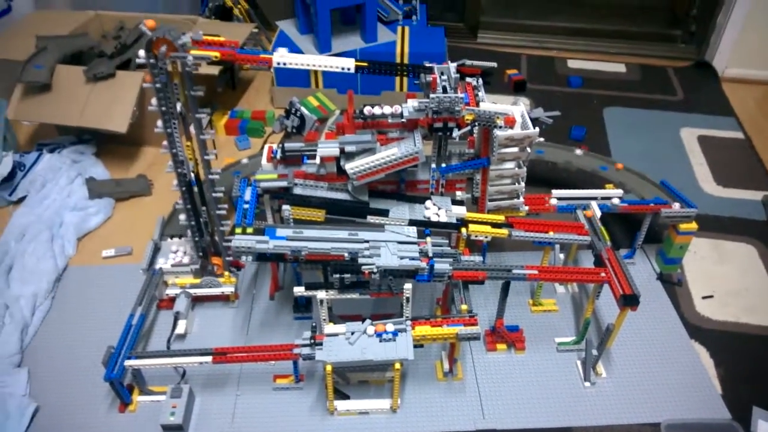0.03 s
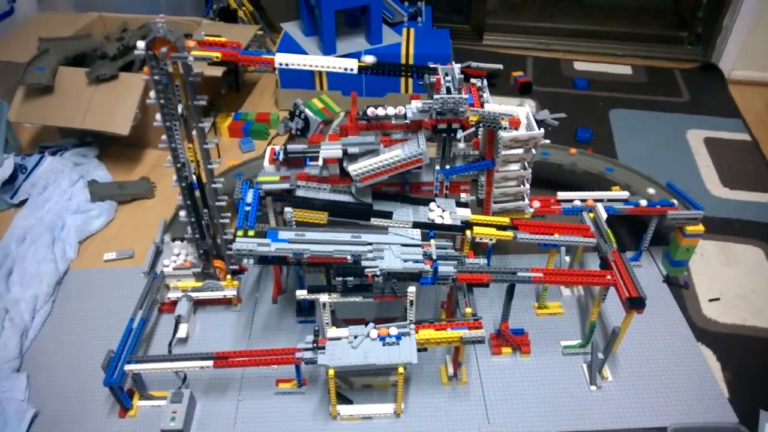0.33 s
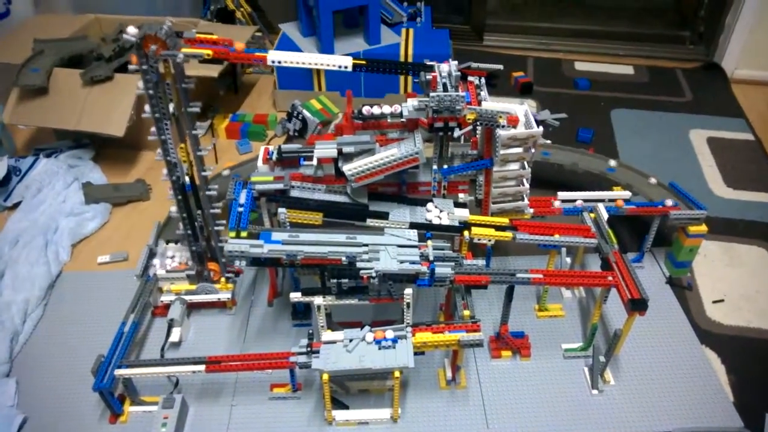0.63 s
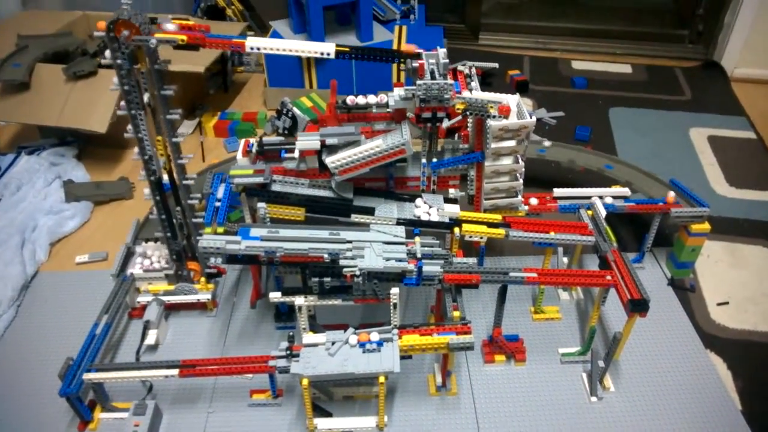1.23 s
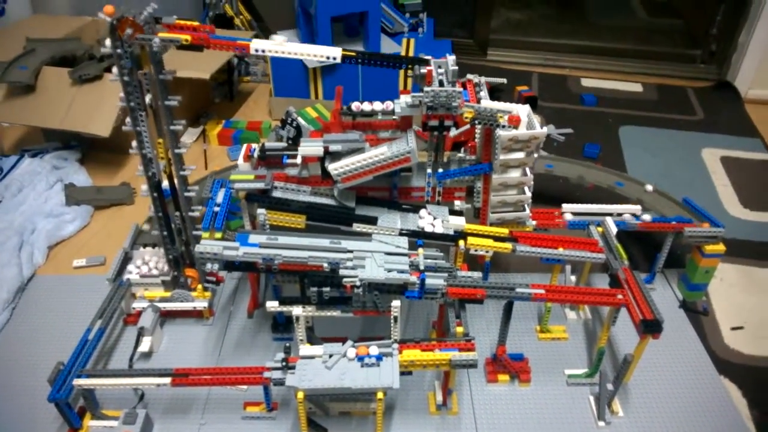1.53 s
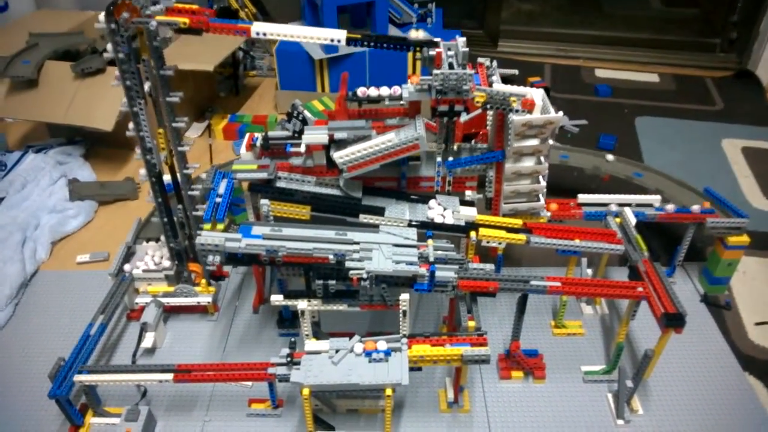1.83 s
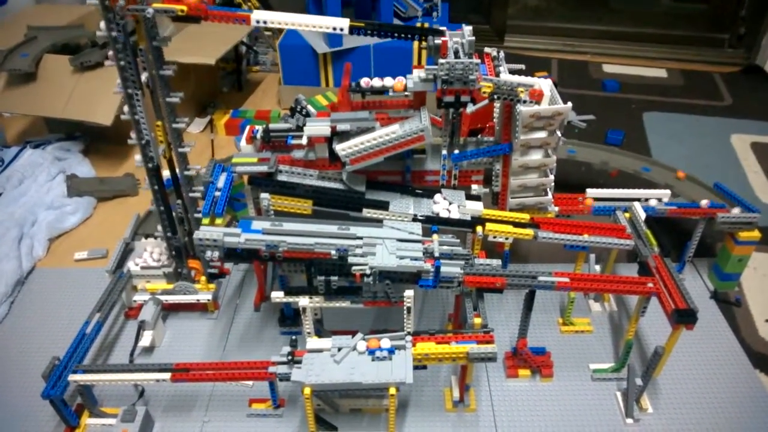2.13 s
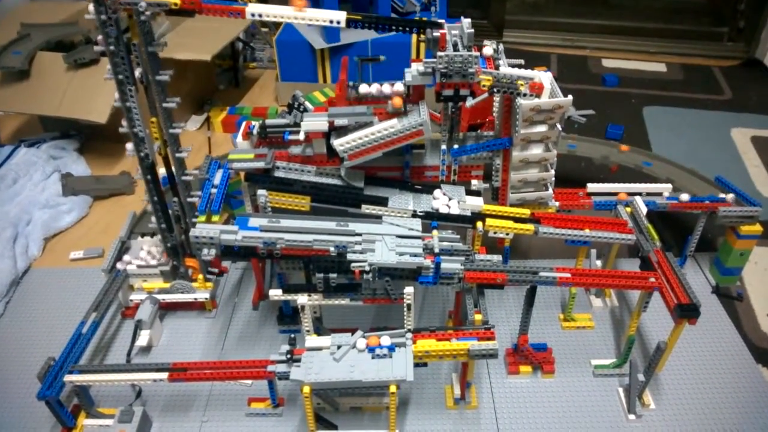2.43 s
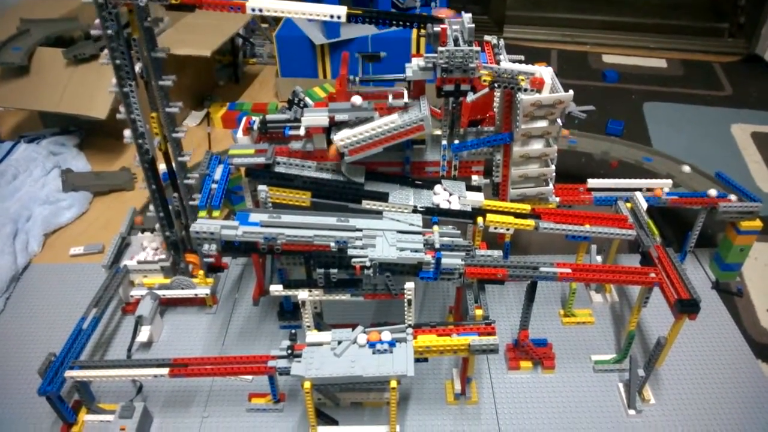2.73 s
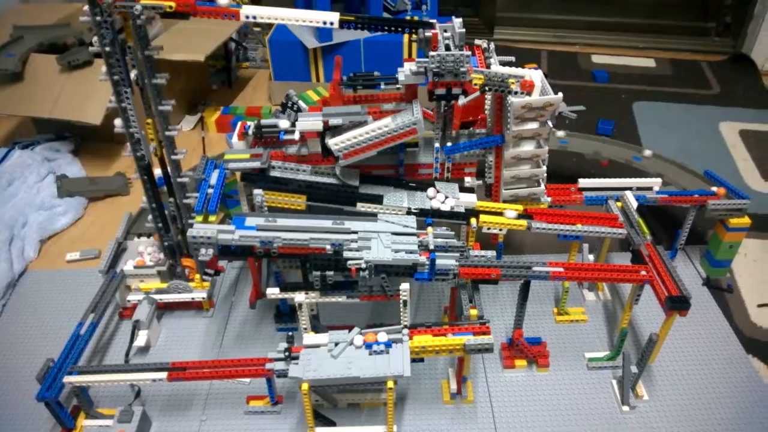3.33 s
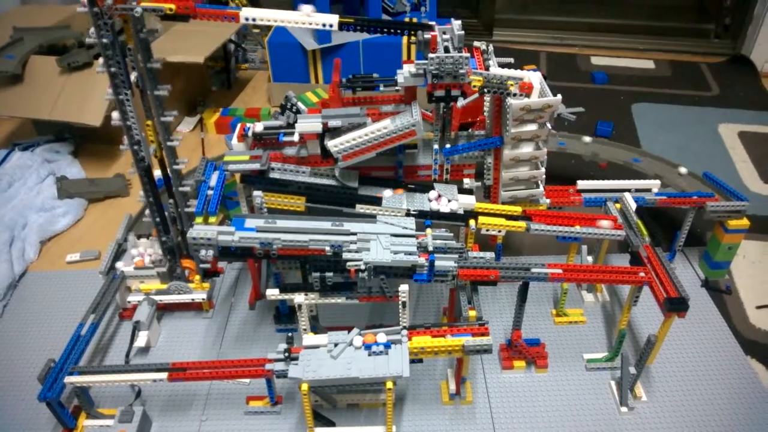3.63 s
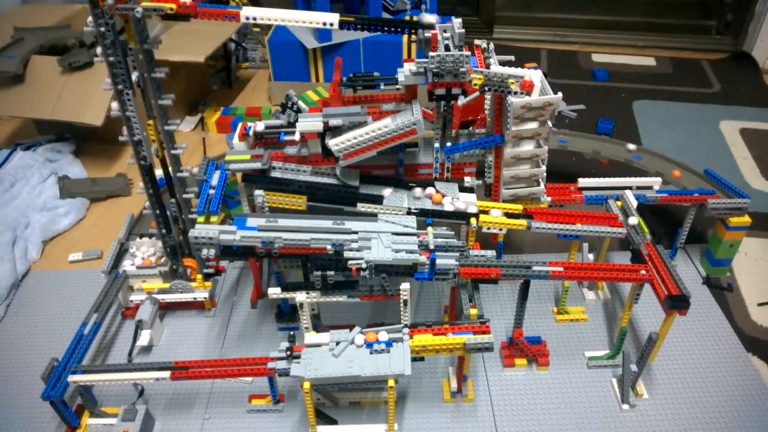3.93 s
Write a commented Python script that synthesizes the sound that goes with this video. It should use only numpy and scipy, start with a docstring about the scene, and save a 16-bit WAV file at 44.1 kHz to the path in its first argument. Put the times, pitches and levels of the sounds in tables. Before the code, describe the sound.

Continuous plastic clatter and clicking balls from a toy brick machine running indoors.

```python
"""A ball-moving machine of plastic toy bricks runs about a metre away in a small room.
Lifts and levers strike the frame and excite its damped modes; beams ping, pins clink and hard balls
click together. Beneath them, random impacts of gears and rolling balls merge into a rattle, with a
fine gear hiss and a faint low rumble. Once something bumps softly right at the microphone."""
import sys
import numpy as np
from scipy import signal
from scipy.fft import rfft, irfft
from scipy.io import wavfile

SR = 44100
rng = np.random.default_rng(int(sys.argv[2]) if len(sys.argv) > 2 else 0)


def dump_mix(stems):
    """Bounce the given channels to the path in sys.argv[1] as a 16-bit WAV at rate SR."""
    frames = np.atleast_2d(stems).T  # one column per channel
    limited = np.clip(frames, -1, 1)  # hard clip at full scale
    pcm = np.round(limited * 32767).astype(np.int16)
    wavfile.write(sys.argv[1], SR, pcm)


N = 176400
T = np.arange(int(.3 * SR)) / SR  # time axis of one impact, t/s

# All levels in the tables are relative; each source applies its own gain.
# Envelope of the rattle: t/s, middle level/dB, treble level/dB
RATTLE_ENVELOPE = [(0.0, -28, -26.5), (0.14, -42.5, -36.5), (0.41, -33, -30.5), (0.54, -39.5, -39.5),
                   (0.88, -35, -36), (1.09, -40.5, -72), (1.32, -43, -36.5), (1.47, -42, -41.5),
                   (1.6, -33, -31.5), (1.67, -36.5, -39), (1.99, -38.5, -39), (2.66, -36.5, -38),
                   (2.82, -39, -35.5), (2.96, -31.5, -35.5), (3.24, -34, -34.5), (3.44, -32.5, -30.5),
                   (3.81, -37, -34), (4.0, -32.5, -35.5)]
# Spectra of the rattle and of the low rumble: f/Hz, level/dB
RATTLE_SPECTRUM = [(120, -70), (200, -18.5), (322, -7), (519, -10), (569, -3), (647, -11.5), (1060, 4.5),
                   (1370, -0.5), (1590, 7), (2210, -2), (2750, -5.5), (4520, -15), (5230, -14.5),
                   (5730, -23.5), (10100, -16.5), (13600, -28), (16000, -43)]
RUMBLE_SPECTRUM = [(20, 1), (50, 1.5), (80, 1.5), (108, 6), (140, -.5), (220, -.5), (400, 0), (1000, -41)]
# Blows on the frame: t/s, level/dB of (snap, hollow body, low ring, middle ring, bright edge), t60/s
FRAME_KNOCKS = [(0.0014, -19.5, -64, -19, -22, -32, 0.17), (0.0265, -12, -52, -18, -17, -26.5, 0.25),
                (0.0424, -21, -52, -15.5, -16, -41, 0.14), (0.0532, -17, -61, -16.5, -21, -27.5, 0.15),
                (0.0659, -35, -51, -20, -25, -51, 0.34), (0.0897, -22, -52, -25, -13, -29.5, 0.17),
                (0.1209, -17.5, -56, -21, -24, -27.5, 0.2), (0.1329, -19.5, -49, -18, -40, -32, 0.18),
                (0.1653, -23, -50, -24.5, -22, -41, 0.19), (0.2022, -25, -53, -24, -33, -39, 0.11),
                (0.2461, -23, -42, -23, -27, -65, 0.44), (0.2957, -18, -49, -28, -20.5, -45, 0.27),
                (0.3279, -21, -41, -31, -21.5, -28.5, 0.085), (0.3571, -19, -45, -22, -18.5, -30, 0.23),
                (0.3722, -19, -40, -23, -22, -32, 0.12), (0.391, -16.5, -56, -22, -15, -28, 0.062),
                (0.5005, -18, -48, -21.5, -16, -31, 0.38), (0.5098, -15.5, -47, -31, -26, -44, 0.14),
                (0.5696, -14, -61, -42, -13, -31, 0.14), (0.61, -17, -42, -19.5, -29, -33, 0.091),
                (0.6221, -35, -35.5, -31, -22, -33, 0.17), (0.6522, -20.5, -38.5, -38, -19.5, -34, 0.13),
                (0.7279, -24.5, -51, -21, -19, -47, 0.48), (0.8002, -25, -37.5, -32, -34, -34, 0.09),
                (0.8866, -21, -39.5, -26, -22, -34, 0.42), (0.9291, -17, -62, -16.5, -19.5, -26.5, 0.13),
                (1.005, -23.5, -70, -19, -25, -32.5, 0.17), (1.0468, -23, -47, -22, -42, -34, 0.55),
                (1.2577, -38, -41, -41, -41, -34, 0.54), (1.3528, -24.5, -39.5, -22.5, -15.5, -30.5, 0.23),
                (1.5194, -15.5, -50, -21.5, -23, -26.5, 0.14), (1.5314, -37, -46, -21.5, -19.5, -47, 0.22),
                (1.5958, -29, -49, -26, -20.5, -32, 0.22), (1.6069, -25, -48, -19, -25, -34, 0.17),
                (1.6534, -21, -36, -21, -25, -33, 0.22), (1.7578, -16, -55, -18, -14, -31, 0.14),
                (1.7712, -24, -41, -29, -38, -34, 0.16), (1.8007, -13, -40, -26, -15, -24, 0.16),
                (1.8069, -30, -42, -25, -18, -32, 0.02), (1.8785, -25, -45, -26, -53, -39, 0.26),
                (1.9564, -18.5, -52, -26.5, -20, -38, 0.23), (1.9802, -27, -34.5, -27.5, -26, -35, 0.36),
                (2.0191, -22, -34.5, -24, -20.5, -31, 0.12), (2.0775, -25, -40, -54, -21.5, -31.5, 0.3),
                (2.1915, -15.5, -49, -17, -20.5, -27.5, 0.11), (2.253, -20.5, -70, -47, -25, -40, 0.15),
                (2.2673, -21, -56, -23, -22.5, -31.5, 0.11), (2.3039, -22, -52, -20, -17, -31, 0.16),
                (2.3112, -12.5, -58, -25, -37, -37, 0.1), (2.3507, -17.5, -36.5, -27, -21, -27.5, 0.16),
                (2.4454, -26, -42, -24.5, -16.5, -32, 0.24), (2.5866, -16, -43, -19.5, -17, -26.5, 0.11),
                (2.6019, -17, -31.5, -15.5, -14.5, -31, 0.42), (2.6409, -16, -49, -26, -24, -30, 0.28),
                (2.6754, -17, -39, -17.5, -20, -31, 0.14), (2.6958, -13.5, -33.5, -19, -29, -37, 0.58),
                (2.7416, -24, -38.5, -32, -18, -39, 0.31), (2.8622, -11.5, -32, -20.5, -11, -26.5, 0.057),
                (2.8828, -14, -30.5, -27, -17, -32, 0.26), (2.94, -9, -32, -13.5, -17, -24, 0.13),
                (2.9547, -15, -35, -38, -23, -39, 0.13), (2.9677, -9.5, -25, -19, -12.5, -25, 0.13),
                (3.0436, -19.5, -36.5, -26, -21, -33.5, 0.11), (3.0975, -17, -58, -17.5, -23, -26.5, 0.11),
                (3.1565, -19, -54, -18, -45, -32, 0.15), (3.1743, -17.5, -47, -38, -23, -30, 0.21),
                (3.2538, -13.5, -36, -14.5, -18, -30, 0.1), (3.2827, -18, -41, -22, -21, -32, 0.068),
                (3.3106, -16.5, -37, -20, -12, -30, 0.45), (3.3823, -21, -35, -19.5, -27, -31, 0.11),
                (3.4177, -15.5, -38, -32, -18.5, -50, 0.16), (3.4597, -16.5, -46, -15.5, -19, -26, 0.14),
                (3.499, -18, -35, -22.5, -15, -25.5, 0.19), (3.5155, -16, -54, -17.5, -11.5, -35, 0.15),
                (3.5306, -14.5, -34, -18.5, -15.5, -33, 0.18), (3.5675, -23, -32, -23, -19, -36, 0.084),
                (3.5836, -15, -32, -19.5, -17.5, -30, 0.24), (3.706, -24, -38, -21, -16, -45, 0.27),
                (3.7626, -24, -35, -31, -25, -33, 0.1), (3.7873, -21, -41, -41, -19, -37, 0.072),
                (3.8261, -13, -34, -31, -14.5, -39, 0.27), (3.8693, -17, -37, -18.5, -15, -32, 0.14),
                (3.8924, -12, -32.5, -22, -16, -38, 0.14), (3.9392, -19, -38, -40, -22, -50, 0.12)]
# Spectra of the hollow body, snap and bright edge of struck plastic: f/Hz, level/dB
BODY_SPECTRUM = [(150, -44), (250, -8.5), (330, 1), (460, 3), (620, -3), (700, 1), (790, 9.5), (880, 7.5),
                 (1100, -25), (2000, -60.5)]
SNAP_SPECTRUM = [(1500, -30), (2700, -6.5), (3600, 4.5), (4500, 2.5), (5200, -4), (5800, -8), (7000, -10.5),
                 (10000, -16)]
EDGE_SPECTRUM = [(3500, -13.5), (6000, -4), (7000, -1), (8700, 3.5), (10300, -1), (11900, -2), (13500, -7),
                 (16000, -30)]
# Normal modes of the frame: f/Hz, level/dB, t60/s
FRAME_MODES = [(917, -9, 0.12), (1082, -4, 0.54), (1237, 3.5, 0.14), (1480, -15, 0.077), (1629, -4.5, 0.16),
               (1770, -7, 0.099), (2155, -3.5, 0.072)]
# Glassy notes of pins and connectors: t/s, f/Hz, level/dB
PIN_CLINKS = [(.044, 6070, -26), (.0548, 9260, -25), (0.33, 7060, -30), (.392, 11670, -22),
              (0.569, 8400, -23), (.652, 8450, -25.5), (.8138, 6850, -29), (.9304, 9270, -25.5),
              (1.519, 8530, -29), (1.58, 9470, -29), (1.9597, 9240, -29), (2.168, 8700, -25.5),
              (2.1916, 8600, -23), (2.818, 8600, -33), (2.877, 8700, -25), (2.967, 12100, -20),
              (3.08, 9200, -28), (3.3145, 10000, -26), (3.499, 8870, -20.5), (3.6358, 10640, -21),
              (3.763, 6400, -25.5)]
# Clear notes of struck beams and rails: t/s, f/Hz, level/dB, t60/s
BEAM_PINGS = [(.054, 1090, -29, 0.25), (.116, 2100, -23.5, 0.1), (.322, 1722, -31, .14),
              (0.359, 1585, -26.5, 0.16), (.391, 3506, -25, 0.1), (0.575, 1871, -22.5, 0.23),
              (.621, 1400, -22.5, 0.15), (.625, 2383, -33, .2), (0.653, 2616, -34, 0.24),
              (.8, 1317, -30, .11), (.886, 4091, -33, 0.08), (.931, 1114, -24.5, 0.12),
              (1.005, 5180, -44, .35), (1.519, 1104, -26, 0.23), (1.771, 1580, -26, 0.12),
              (1.8, 959, -25.5, 0.15), (1.807, 2202, -16.5, 0.085), (2.191, 1122, -31.5, 0.38),
              (2.310, 1041, -30.5, 0.18), (2.31, 4510, -34.5, 0.23), (2.351, 1813, -29, 0.23),
              (2.864, 2153, -22, 0.13), (2.94, 3720, -24, 0.081), (2.940, 768, -27.5, 0.26),
              (2.94, 1566, -19.5, 0.11), (2.968, 2100, -23, 0.11), (3.174, 1091, -34, .15),
              (3.46, 1100, -30, 0.19), (3.498, 1245, -25.5, 0.29), (3.509, 1597, -26, 0.15),
              (3.872, 1730, -24, 0.12)]
# Collisions of ball with ball, plus a few short sharp clacks at the hardest blows on the frame: t/s, level/dB,
# f/Hz
BALL_CLICKS = [(0.4574, -2.5, 2060), (0.737, -9.5, 2180), (0.7468, -6, 2070), (0.8135, -7.5, 2070),
               (0.8541, -8.5, 2180), (1.2784, -4, 2130), (1.3545, -16, 2060), (1.3808, -3.5, 2080),
               (1.4426, -13.5, 2100), (1.4837, -14.5, 2130), (1.7529, -17, 2100), (1.8005, -1.5, 2235),
               (2.0803, -11, 2060), (2.4204, -10, 1940), (2.4339, -5, 2210), (2.4654, -6.5, 2000),
               (2.674, -12, 1910), (2.7043, 0.5, 2070), (2.7407, -7, 2140), (2.794, -10, 2000),
               (2.8639, -5, 2290), (2.9037, -0.5, 2140), (2.9334, -14, 2200), (2.9408, -10, 2220),
               (2.9682, -7, 2140), (3.2555, -16, 2040), (3.6356, 1.5, 2010), (3.7243, -4, 2030),
               (3.7479, -2.5, 1970), (3.8075, -12, 2100)]
# Spectrum of the tick of ball contact: f/Hz, level/dB
BALL_TICK_SPECTRUM = [(1000, -49), (3000, 18), (4200, 3), (5300, 5), (6500, 5), (8500, 0.5), (11000, 4),
                      (13000, -5), (16000, -27)]
# Modes of the bump: f/Hz, level/dB, t60/s
BUMP_MODES = [(55, -15, 0.066), (168, -7, 0.022), (385, -2, 0.014), (513, -9, 0.027), (830, -7, 0.02),
              (1010, -1, 0.016)]


def undb(db):
    """Amplitude ratio of a level in decibels."""
    return 10 ** (np.asarray(db) / 20)


def unit(x):
    """Normalisation to rms 1."""
    return x / np.sqrt(np.mean(x ** 2))


def blow(x):
    """Normalisation to the energy of a 20 ms burst of rms 1."""
    return x * np.sqrt(.02 * SR / np.sum(x ** 2))


def fade(t60):
    """Exponential damping: 60 dB in t60 seconds."""
    return np.exp(-np.log(1000) * T / t60)


def mode(hz, t60):
    """Free vibration of a damped oscillator."""
    return fade(t60) * np.sin(2 * np.pi * hz * T)


def hiss(envelope):
    """Dense modes that decay together sum to noise under one envelope."""
    return envelope * rng.standard_normal(len(T))


def band(x, edges_hz, order=2):
    """Butterworth band-pass filter."""
    return signal.sosfilt(signal.butter(order, edges_hz, "band", fs=SR, output="sos"), x)


def colour(x, spectrum, size=2048):
    """Minimum-phase filter through (f/Hz, level/dB) points, formed by folding the cepstrum."""
    hz, db = np.array(spectrum).T
    bin_hz = np.arange(size + 1) * SR / size / 2
    log_gain = np.log(undb(np.interp(np.log(bin_hz + 1), np.log(hz), db)))
    cepstrum = irfft(log_gain)[:size]
    cepstrum[1:] *= 2
    response = irfft(np.exp(rfft(cepstrum, 2 * size)))[:size]
    return signal.fftconvolve(x, response)[:len(x)]


def add(out, s, x):
    """Superposition of x on out, starting at s seconds."""
    i = int(s * SR)
    out[i:i + len(x)] += x[:max(N - i, 0)]


def rumble():
    """Noise confined to low frequencies is heard as a faint, steady rumble."""
    return undb(-62) * unit(colour(rng.standard_normal(N), RUMBLE_SPECTRUM, size=8192))


def gear_hiss():
    """The gears give off stationary band-limited noise near 10 kHz."""
    return undb(-61.5) * unit(band(rng.standard_normal(N), (9700, 10500), order=1))


def gear_ticks(per_s=300, low_hz=891, high_hz=5523):
    """Shot noise: gear teeth and chain links strike at random, each with a crack and six damped modes."""
    t = T[:len(T) // 6]
    decay = fade(t60=.064)[:len(t)]
    crack = undb(-7) * fade(t60=.018)[:len(t)]
    rings, crack_power = np.zeros((2, N))
    for when, chance, *pitches in rng.random((int(per_s * N / SR), 8)):
        hz = low_hz * (high_hz / low_hz) ** np.array(pitches)[:, None]
        strength = undb(1.5 * min(-np.log(chance), 3))
        modes = np.sqrt(hz / high_hz) * np.sin(2 * np.pi * hz * t)
        add(rings, when * N / SR, strength * decay * modes.mean(axis=0))
        add(crack_power, when * N / SR, (strength * crack) ** 2)
    return unit(rings + np.sqrt(crack_power) * rng.standard_normal(N))


def stud_taps(per_s=70):
    """Balls rolling over studs and seams make a Poisson train of bright, dry ticks."""
    impulses = (rng.random(N) < per_s / SR) * rng.random(N)
    envelope = signal.fftconvolve(impulses, fade(t60=.012))[:N]
    return unit(colour(envelope * rng.standard_normal(N), EDGE_SPECTRUM))


def rattle():
    """Gear ticks and rolling noise add incoherently; middle and treble follow separate envelopes."""
    s, middle_db, treble_db = np.array(RATTLE_ENVELOPE).T
    t = np.arange(N) / SR
    rolling = undb(-4) * rng.standard_normal(N)
    running = colour(undb(-.5) * gear_ticks() + rolling, RATTLE_SPECTRUM)
    middle = unit(band(running, (220, 2800), order=3))
    treble = unit(band(running, (2800, 17000), order=3))
    treble = unit(treble + undb(-9) * stud_taps())
    return middle * undb(np.interp(t, s, middle_db)) + treble * undb(np.interp(t, s, treble_db) - 4.5)


def chatter(per_s=52, decay_s=.0084):
    """Envelope of a blow and the rebounds of loose parts: incoherent contacts add in power."""
    contacts = (rng.random(len(T)) < per_s / SR) * undb(3) ** 2 * np.exp(-T / decay_s)
    contacts[0] = 1
    power = signal.fftconvolve(contacts, fade(t60=.018) ** 2)[:len(T)]
    return np.sqrt(np.abs(power))


def part_ring(edges_hz, t60, count=6):
    """A small part vibrates freely in a few modes of random frequency, amplitude and phase."""
    position, amplitude, phase = rng.random((3, count, 1))
    hz = edges_hz[0] + position * (edges_hz[1] - edges_hz[0])
    t = T[:len(T) // 3]
    modes = np.sum(amplitude * np.sin(2 * np.pi * (hz * t + phase)), axis=0)
    return np.pad(modes, (0, len(T) - len(t))) * fade(t60)


def frame_ring(low_db, middle_db, split_hz):
    """Modal superposition: a blow excites each frame mode with random strength and slight detuning."""
    modes = np.zeros(len(T))
    for hz, db, t60 in FRAME_MODES:
        amplitude, detune = rng.standard_normal(2)
        drive_db = low_db if hz < split_hz else middle_db
        modes += amplitude * undb(db + drive_db - 16.5) * mode(hz * (1 + .0072 * detune), t60)
    return band(modes, (800, 2800))


def lever_knocks():
    """Impulse excitation: a lever strikes, a brick cracks and pings, and the frame rings in dense modes."""
    low_hz, middle_hz, snap_hz, edge_hz = (915.3, 1511.6), (1493.3, 2538), (2778, 5586), (7700, 13000)
    ping_gain = undb(-1)
    out = np.zeros(N)
    for s, snap_db, body_db, low_db, middle_db, edge_db, t60 in FRAME_KNOCKS:
        crack = chatter()
        bright_envelope = np.hypot(crack, undb(1.5) * fade(t60))
        ring_envelope = np.hypot(fade(t60), undb(-22) * crack)
        knock = undb(body_db - 7.5) * blow(colour(hiss(ring_envelope), BODY_SPECTRUM, size=1024))
        for spectrum, edges_hz, db in ((SNAP_SPECTRUM, snap_hz, snap_db - 17),
                                       (EDGE_SPECTRUM, edge_hz, edge_db - 8.5)):
            ping = blow(colour(part_ring(edges_hz, t60=.035), spectrum, size=256))
            dense = blow(colour(hiss(bright_envelope), spectrum, size=256))
            knock += undb(db) * blow(dense + ping_gain * ping)
        for edges_hz, db in ((low_hz, low_db - 12.5), (middle_hz, middle_db - 13.5)):
            ping = blow(band(part_ring(edges_hz, t60, count=3), edges_hz))
            dense = blow(band(hiss(ring_envelope), edges_hz, order=3))
            knock += undb(db) * blow(dense + ping_gain * ping)
        add(out, s, knock + frame_ring(low_db, middle_db, split_hz=low_hz[1]))
    return out


def pin_clinks(t60=.022, spread=.39):
    """A small, hard part has high natural frequencies: one main mode with weaker ones around it."""
    out = np.zeros(N)
    for s, hz, db in PIN_CLINKS:
        side_modes = part_ring((hz * (1 - spread), hz * (1 + spread)), t60, count=4)
        add(out, s, undb(db - 2.5) * (mode(hz, t60) + undb(-4) * side_modes))
    return out


def beam_pings(beat_spread_hz=17):
    """Beating: two close modes of a struck beam start in phase and interfere as they decay."""
    out = np.zeros(N)
    onset = 1 - fade(t60=.012)
    for s, hz, db, t60 in BEAM_PINGS:
        beat_hz = beat_spread_hz * rng.standard_normal()
        pair = mode(hz, t60) + undb(-8) * mode(hz + beat_hz, t60)
        add(out, s, undb(db - .5) * onset * pair)
    return out


def ball_clicks(rise_s=.00049):
    """Elastic collision of hard balls: a few cycles of a clear note, a tick and a short ring of the track."""
    out = np.zeros(N)
    pulse = (T / rise_s / 2) ** 2 * np.exp(2 - T / rise_s)
    envelope = pulse + undb(-15.5) * fade(t60=.054)
    for s, db, hz in BALL_CLICKS:
        note = band(envelope * np.sin(2 * np.pi * hz * T), (1000, 9000), order=1)
        tick = blow(colour(hiss(fade(t60=.012)), BALL_TICK_SPECTRUM, size=256))
        track = blow(band(hiss(fade(t60=.12)), (hz * .7, hz * 1.37)))
        add(out, s, undb(db - 10) * (note + undb(-25) * tick + undb(-18) * track))
    return out


def bump(start_s=1.3152):
    """Heavily damped low modes make a dull bump at the microphone, with a soft tick of contact."""
    out = np.zeros(N)
    modes = -sum(undb(db) * mode(hz, t60) for hz, db, t60 in BUMP_MODES)
    tick = blow(band(hiss(fade(t60=.01)), (1400, 4000)))
    add(out, start_s, undb(-21) * (band(modes, (35, 4000)) + undb(-14) * tick))
    return out


def room(direct, t60=.39, gap_s=.0027):
    """Reverberation: a furnished room adds diffuse reflections whose treble is absorbed sooner."""
    low = band(hiss(fade(t60)), (150, 3000), order=1)
    treble = band(hiss(fade(.81 * t60)), (3000, 15000), order=1)
    tail = (low + undb(-8) * treble) * (T > gap_s) / np.sqrt(np.sum(fade(t60) ** 2))
    return direct + undb(-4) * signal.fftconvolve(direct, tail)[:N]


def scene():
    """Linear superposition of the running noises, the reverberant impacts and the close bump, in mono."""
    running = rumble() + gear_hiss() + rattle()
    impacts = lever_knocks() + pin_clinks() + beam_pings() + ball_clicks()
    return (running + room(impacts) + bump())[None]


def record(dry):
    """Band limiting: a steep elliptic low-pass removes the treble above 15.9 kHz."""
    return signal.sosfilt(signal.ellip(10, .2, 80, 15900, fs=SR, output="sos"), dry)


dry = scene()
out = record(dry)
dump_mix(out)
```